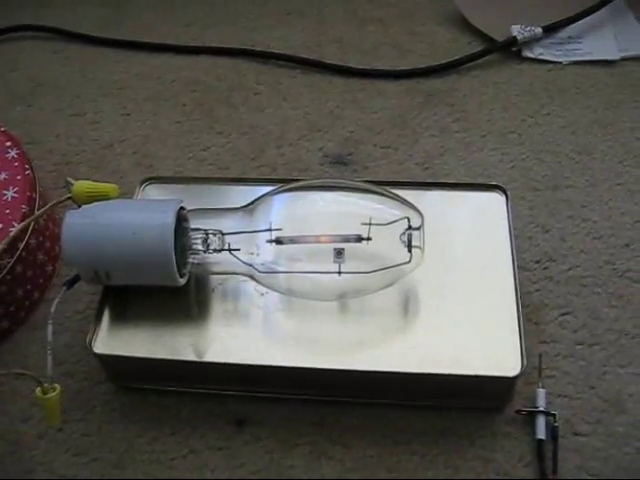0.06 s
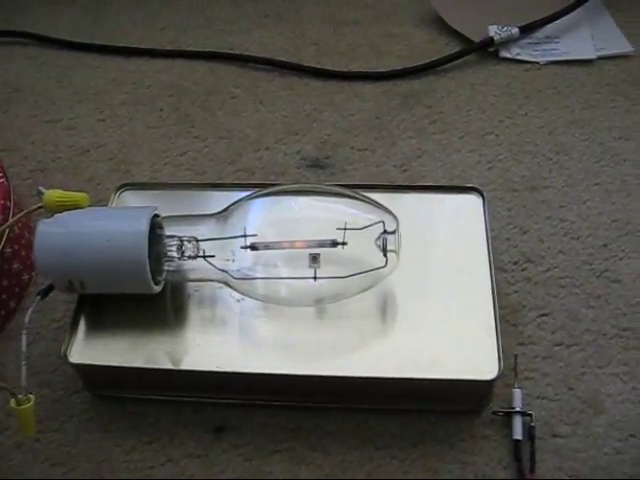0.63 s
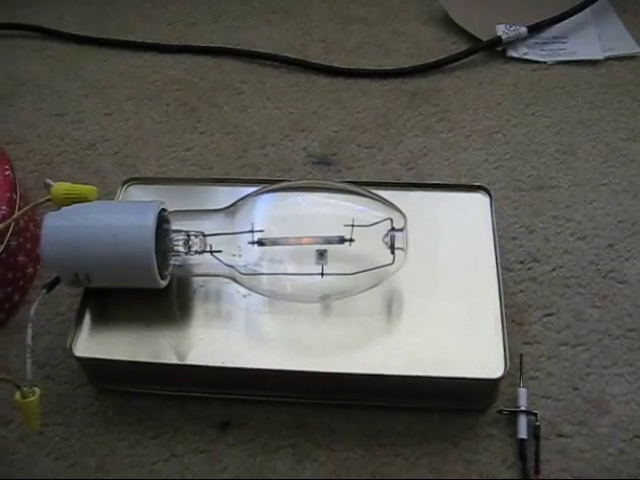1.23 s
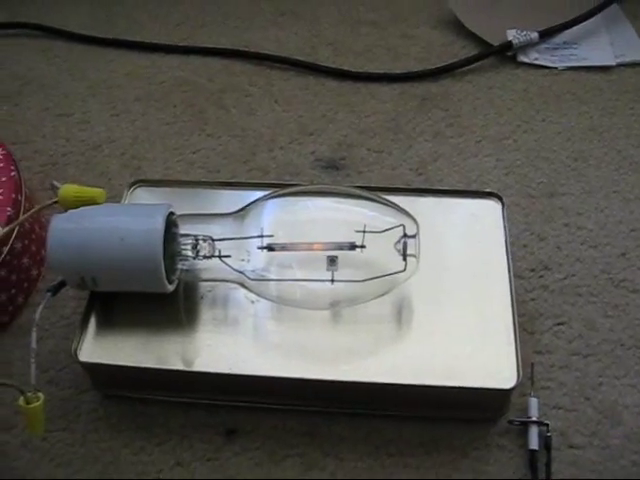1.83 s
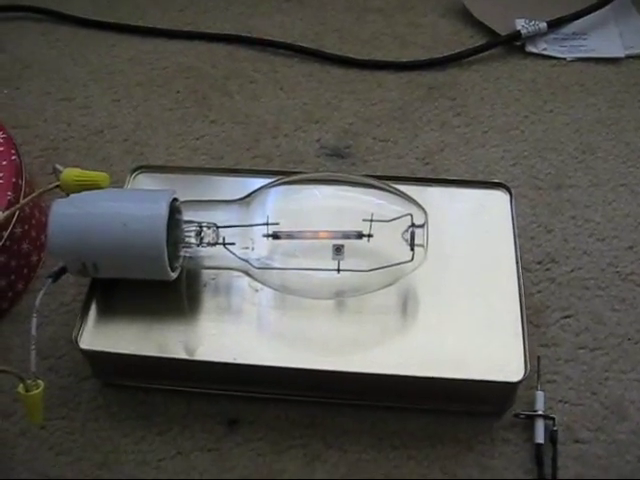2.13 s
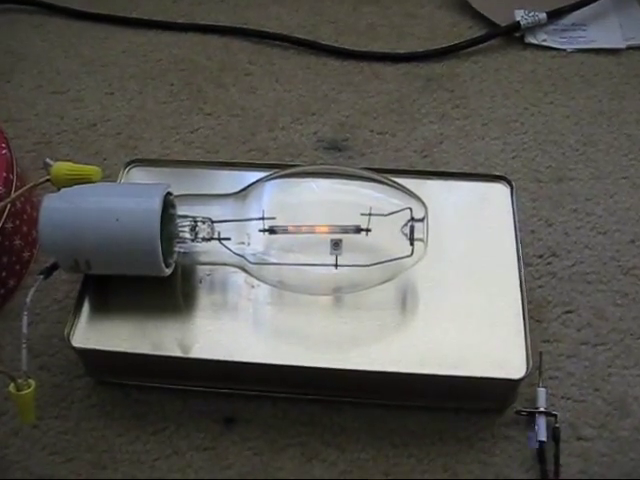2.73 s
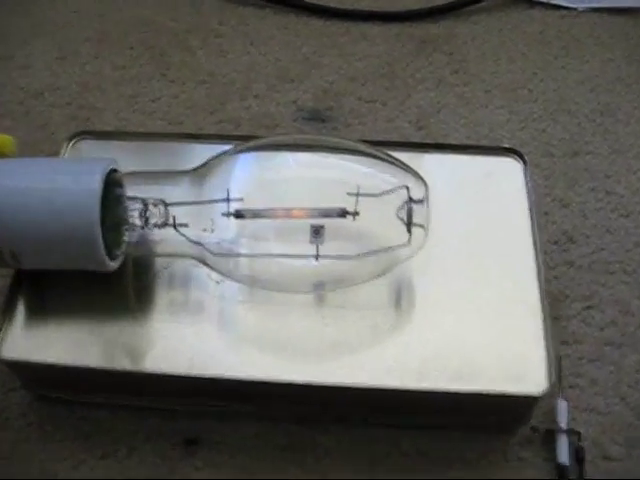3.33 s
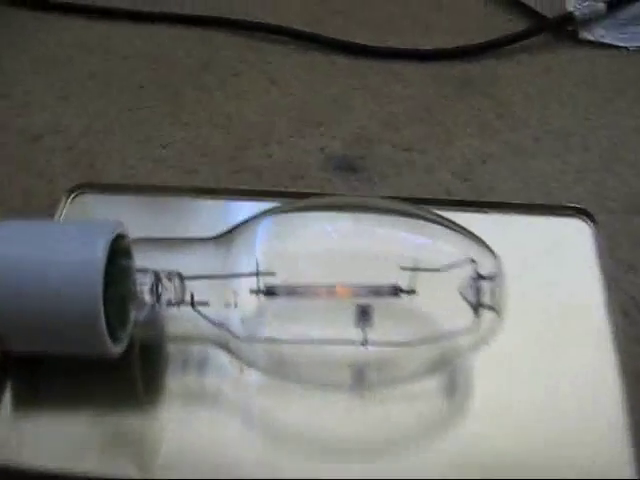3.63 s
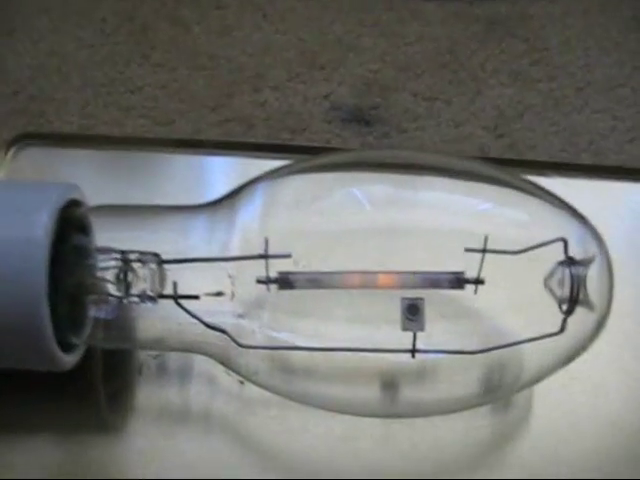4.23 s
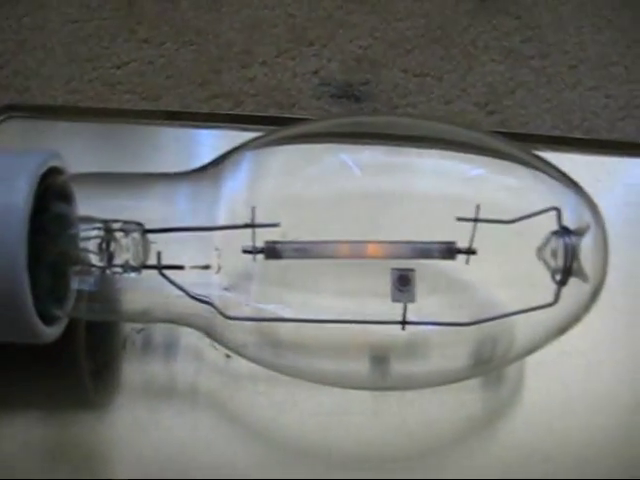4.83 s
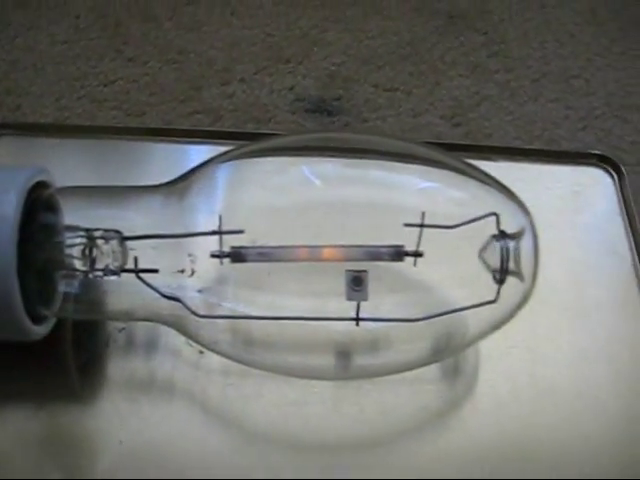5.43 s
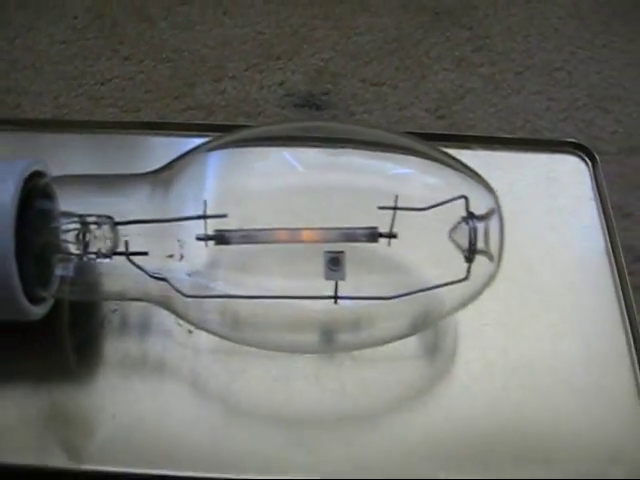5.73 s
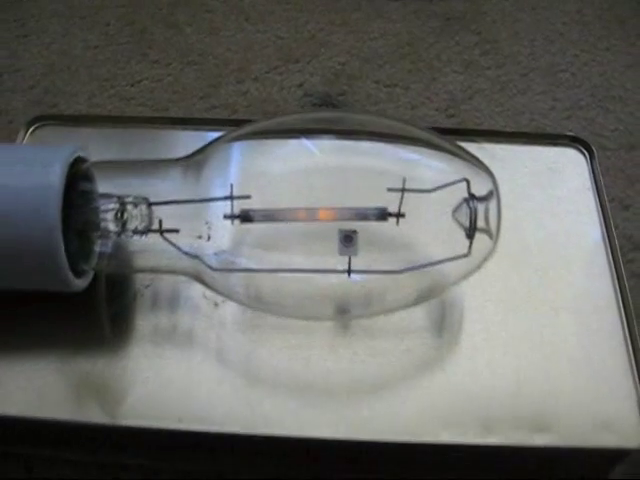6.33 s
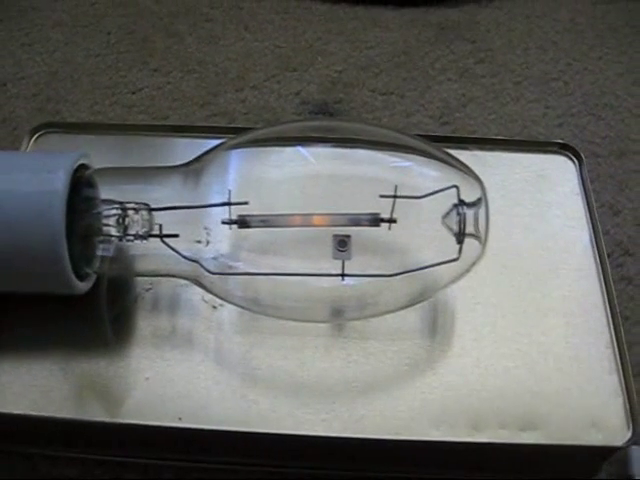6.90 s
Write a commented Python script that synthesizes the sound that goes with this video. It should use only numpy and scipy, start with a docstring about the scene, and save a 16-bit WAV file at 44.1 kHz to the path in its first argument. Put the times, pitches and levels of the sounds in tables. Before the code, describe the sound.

An electronic gas igniter gives a single sharp click, pauses for about half a second, then sparks in a steady run of roughly seven snaps a second. Each snap is tiny, bright and a little different in strength, with a short room echo. Underneath are a faint electrical hum and low rumble, which the small, close microphone turns into a gritty crackle.

```python
"""A gas igniter snaps about seven times a second, wired to a lamp that lies on a metal tin.
Each spark makes a tiny, loud click that echoes around a humming, rumbling room.
There is one light knock, and a hand bumps the pocket camera that picks up the sound.
Each loud spark slams the camera's volume down, and it then creeps back up.
The camera's coarse 8-bit steps clip the biggest peaks and turn quiet sound into a sparse crackle."""
import sys
import numpy as np
from scipy import signal
from scipy.fft import rfft, irfft
from scipy.io import wavfile

SR = 44100
rng = np.random.default_rng(int(sys.argv[2]) if len(sys.argv) > 2 else 0)


def generate_wav(signal):
    """Clip the signal to [-1, 1] and save it as 16-bit WAV at the path in sys.argv[1]."""
    frames = np.transpose(np.atleast_2d(signal))
    scaled = np.clip(frames, -1, 1) * 32767
    pcm = np.round(scaled).astype(np.int16)
    wavfile.write(sys.argv[1], SR, pcm)


N = 306936
TIME = np.arange(N) / SR
HOLD = 4  # the camera keeps one sample in four

# Each spark's click as the camera catches it, some sharper, some duller:
# start_s, sharp_db, pitch_hz, dull_db
SPARKS = [(0.6891, -39, 2370, 6.5), (0.8453, -6.5, 4520, -36), (1.4171, -8, 4450, -41),
          (1.5751, 0.5, 3470, -27.5), (1.7311, -6, 3370, -36.5), (1.9001, 0, 3600, -41),
          (2.0588, -10, 4360, -37), (2.2137, -2, 3300, -36), (2.3667, -6, 3340, -36),
          (2.5226, -12, 4800, -30.5), (2.6765, -2, 3320, -38), (2.8313, -3, 4800, -11.5),
          (2.9861, -19, 4960, -12), (3.1406, -6.5, 2830, -13.5), (3.2965, -8, 4420, -37.5),
          (3.4501, -6, 3150, -10.5), (3.602, -14.5, 3200, -13.5), (3.7497, -6.5, 3110, -10.5),
          (3.8928, -1, 4020, -40), (4.034, -2.5, 3670, -6), (4.1743, -2.5, 3980, -19),
          (4.3154, 1.5, 3600, -36), (4.4556, -1, 4370, -44), (4.5978, -0.5, 3560, -45),
          (4.7372, -10, 3540, -37.5), (4.8773, 1.5, 4310, -36), (5.0174, -5, 4000, -36),
          (5.1584, -11, 3250, -21), (5.297, -4.5, 3450, -21), (5.4366, -5.5, 2780, -41),
          (5.5758, -15.5, 4460, -12), (5.7153, -7.5, 2360, -21.5), (5.8548, -1, 3260, -35.5),
          (5.994, -7.5, 2850, -36), (6.1335, 2, 3600, -31), (6.2727, -3, 4080, -16.5),
          (6.412, -5.5, 3000, -27), (6.5514, -7, 3170, -13.5), (6.69, -4, 3160, -17.5),
          (6.8297, -1, 3920, -32.5)]
# A light knock: start_s, pitch_hz, level_db, ring_s (time to fade by 60 dB)
KNOCKS = [(4.2, 1105, -24.5, 0.038)]
# Soft bumps of the hand on the camera: peak_time_s, level_db
HAND_BUMPS = [(5.157, -33.5), (6.272, -33), (6.695, -37.5)]
# The tones of the mains hum and faint steady whines: pitch_hz, level_db
HUM_TONES = [(120, -50), (240, -48.5), (360, -59), (428, -60), (480, -57), (600, -51.5), (720, -63),
             (840, -66.5), (1443, -67), (3464, -65.5)]
# The room's rumble, from low to high: frequency_hz, relative_level_db
RUMBLE_SHAPE = [(12, -9.5), (28, 3.5), (42, -7.5), (56, -6), (78, -1.5), (100, -7), (160, -9), (210, -10.5),
                (280, -21), (450, -15.5), (800, -24), (1500, -28.5), (3000, -33), (5400, -35.5)]
# Level of the background crackle, with a brief near-silent gap around 5.7 s: time_s, gain_db
CRACKLE_LEVEL = [(0, 1), (0.79, 3), (0.97, -4.5), (1.1, 1), (1.36, 0.5), (1.55, -4), (2.3, -5), (2.75, -2),
                 (3.1, -3.5), (4.3, -4.5), (5.12, -1), (5.5, -2), (5.68, -7.5), (5.85, -2), (6.2, 0.5),
                 (6.42, -3.5), (6.96, -3.5)]


def igniter(echo_delay_s=.0027, echo_db=-17, boom_hz=35.19, boom_db=-47, boom_ring_s=.9):
    """Each spark snaps, echoes, makes the microphone swing back and leaves a faint deep boom."""
    out, t = np.zeros(N), TIME[:SR // 2]
    boom = undb(boom_db) * fade(t, boom_ring_s) * np.sin(2 * np.pi * boom_hz * t)
    for (start_s, sharp_db, pitch_hz, dull_db), chance in zip(SPARKS, rng.standard_normal(len(SPARKS))):
        click = spark_click(t, sharp_db, pitch_hz, dull_db)
        tail_db = -37 + .25 * max(sharp_db, dull_db)  # stronger sparks echo a little louder
        tail = undb(tail_db) * room_echoes(t)
        mic_undershoot = undb(-33 + 2 * chance) * np.exp(-t / .006)  # a short dip below zero
        add(out, start_s, click + tail - mic_undershoot)
        add(out, start_s + echo_delay_s, undb(echo_db) * click)
        add(out, start_s + .004, -boom)
    return out


def spark_click(t, sharp_db, pitch_hz, dull_db, sharp_decay_s=.00021, dull_decay_s=.0001):
    """One spark's click as the camera catches it; dull_db sets how dull it sounds."""
    sharp = undb(sharp_db) * np.exp(-t / sharp_decay_s) * np.cos(2 * np.pi * pitch_hz * t + np.pi / 4)
    dull = undb(dull_db) * np.exp(-t / dull_decay_s)
    return sharp + dull


def room_echoes(t, ring_s=.44, near_decay_s=.0034, wall_delay_s=.013, wall_width_s=.0016):
    """Sound bounces off the nearby tin and lamp, then off the walls, then dies away in the room."""
    near = undb(3) * np.exp(-t / near_decay_s)
    walls = undb(-2) * np.exp(-((t - wall_delay_s) / wall_width_s) ** 2)
    return (near + walls + fade(t, ring_s)) * rng.standard_normal(len(t))


def knock():
    """Something is touched softly and rings briefly at one pitch."""
    out, t = np.zeros(N), TIME[:SR // 4]
    for start_s, pitch_hz, level_db, ring_s in KNOCKS:
        add(out, start_s, undb(level_db) * fade(t, ring_s) * np.sin(2 * np.pi * pitch_hz * t))
    return out


def hand_bumps(width_s=.018, cutoff_hz=150):
    """The hand shifts on the camera, making brief swells of dull noise."""
    swells = sum(undb(level_db) * np.exp(-((TIME - peak_time_s) / width_s) ** 2)
                 for peak_time_s, level_db in HAND_BUMPS)
    return swells * noise(lambda f: 1 / (1 + (f / cutoff_hz) ** 2))


def room_background(rumble_db=-45, waver_db=.75, waver_hz=24):
    """A low rumble and a wavering mains hum, heard as crackle through the camera's 8-bit steps."""
    shape_hz, shape_db = np.transpose(RUMBLE_SHAPE)
    top_hz = SR / HOLD / 2  # the highest pitch the camera can hold
    rumble = noise(lambda f: undb(np.interp(np.log(f), np.log(shape_hz), shape_db)) * (f < top_hz))
    hum = np.zeros(N)
    for pitch_hz, level_db in HUM_TONES:
        strength = np.sqrt(2) * undb(level_db + waver_db * wander(waver_hz))
        hum += strength * np.sin(2 * np.pi * (pitch_hz * TIME + rng.random()))
    crackle_gain = undb(np.interp(TIME, *np.transpose(CRACKLE_LEVEL)))
    return (undb(rumble_db) * rumble + hum) * crackle_gain


def camera_noise(whine_hz=2005, whine_db=-61, frame_hz=30, throb_db=-66, hiss_db=-66):
    """The camera adds its own thin whine, a throb at its frame rate and a hiss."""
    # The narrow whine flutters, so it tips the 8-bit steps in short bursts.
    whine = noise(lambda f: 1 / np.hypot(1, (f - whine_hz) / 45))
    throb = np.sqrt(2) * np.sin(2 * np.pi * frame_hz * TIME)
    return undb(whine_db) * whine + undb(throb_db) * throb + undb(hiss_db) * rng.standard_normal(N)


def automatic_volume(x, threshold=.075, drop_db=-18, recover_db_per_s=19):
    """Just after a loud peak the camera turns itself down, then climbs steadily back."""
    was_loud = np.roll(np.abs(x) > threshold, HOLD)  # one camera sample late, so the attack gets through
    last_peak_s = np.maximum.accumulate(np.where(was_loud, TIME, -np.inf))
    gain_db = np.minimum(0, drop_db + recover_db_per_s * (TIME - last_peak_s))
    return x * undb(gain_db)


def undb(db):
    """Turn decibels into a number to multiply by."""
    return 10 ** (np.asarray(db) / 20)


def fade(t, ring_s):
    """A smooth fade that falls by 60 dB in ring_s seconds."""
    return np.exp(-np.log(1000) * t / ring_s)


def noise(gain_at):
    """Noise of typical size 1, with its lows and highs shaped by gain_at(frequency_hz)."""
    frequency_hz = np.fft.rfftfreq(N, 1 / SR) + 1
    x = irfft(rfft(rng.standard_normal(N)) * gain_at(frequency_hz), N)
    return x / x.std()


def wander(rate_hz):
    """A random drift of typical size near 1 that turns rate_hz times a second."""
    return 1.2 * np.interp(TIME * rate_hz, np.arange(1024), rng.standard_normal(1024))


def add(out, start_s, x):
    """Mix x into out, starting at the camera sample nearest to start_s."""
    i = HOLD * int(round(start_s * SR / HOLD))
    out[i:i + len(x)] += x[:N - i]


def scene():
    """Sparks, a knock and hand bumps over the room's background, in one channel."""
    return (igniter() + knock() + hand_bumps() + room_background())[None]


def record(dry):
    """The camera sets its volume, then rounds to 8-bit steps, so quiet sound comes out as ticks."""
    step_size, cutoff_hz = 1 / 128, 15700
    x = (automatic_volume(dry[0]) + camera_noise())[::HOLD]
    steps = np.clip(np.round(x / step_size - .05) - 1, -128, 127)  # silence sits one step below zero
    faint_hiss = undb(-78.5) * rng.standard_normal(len(x))
    stairs = np.repeat(steps * step_size + faint_hiss, HOLD)[:N]  # hold each value until the next
    return signal.fftconvolve(stairs, signal.firwin(129, cutoff_hz, fs=SR), "same")[None]


dry = scene()
out = record(dry)
generate_wav(out)
```